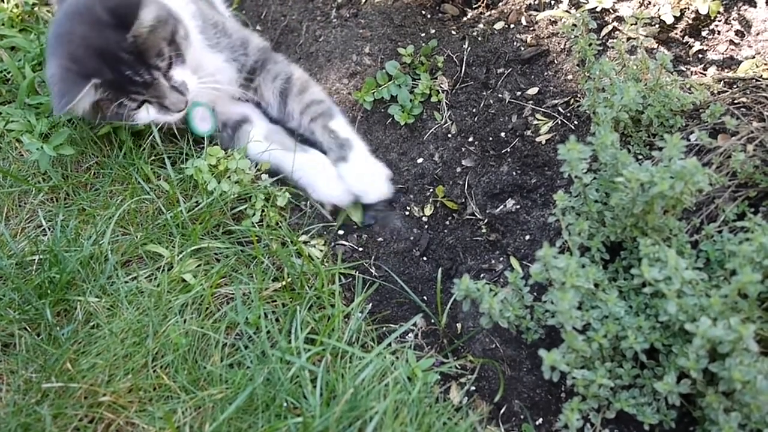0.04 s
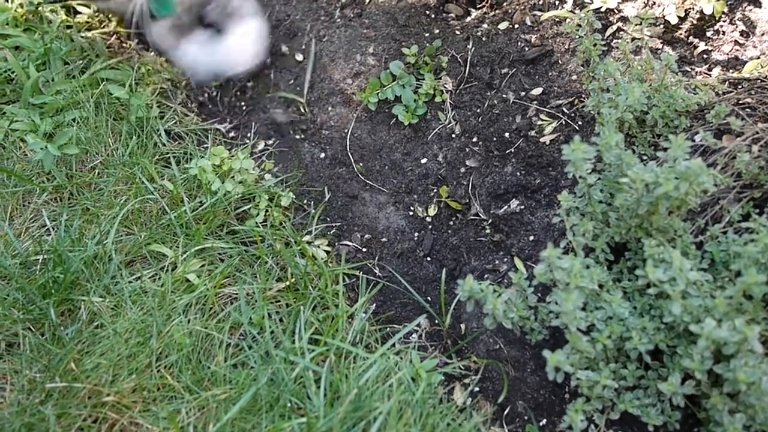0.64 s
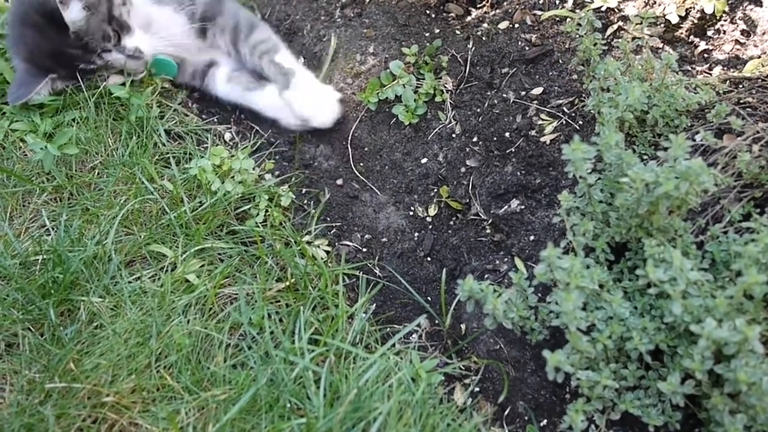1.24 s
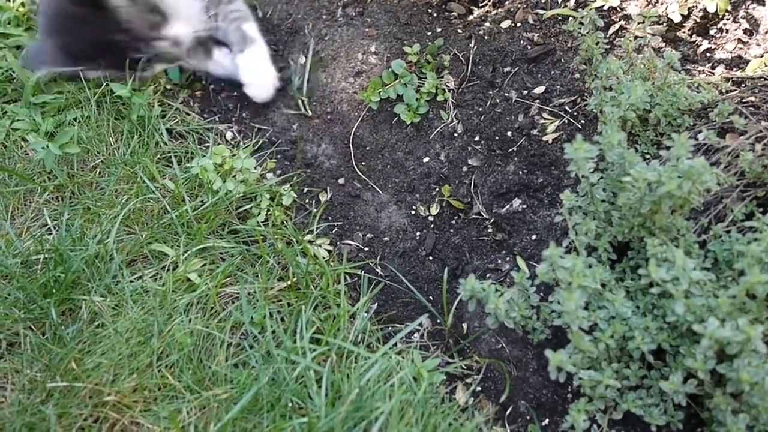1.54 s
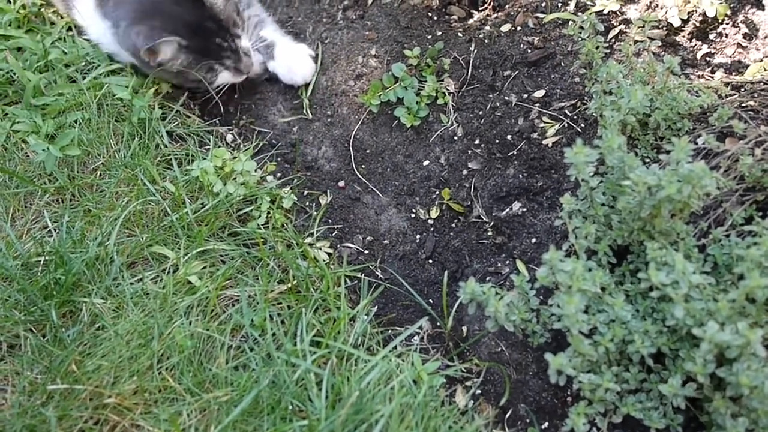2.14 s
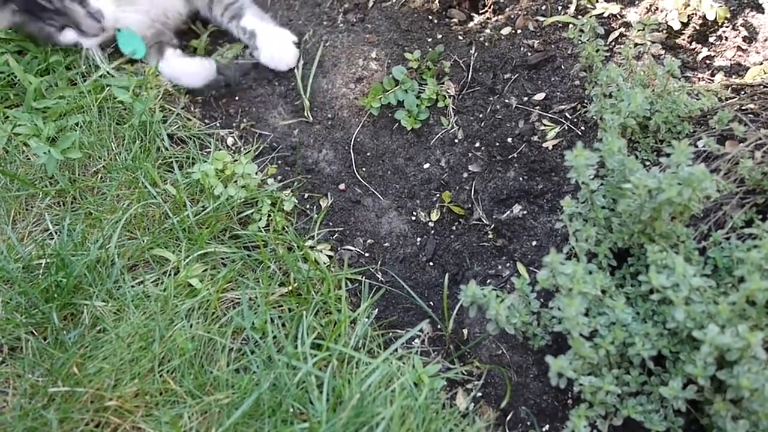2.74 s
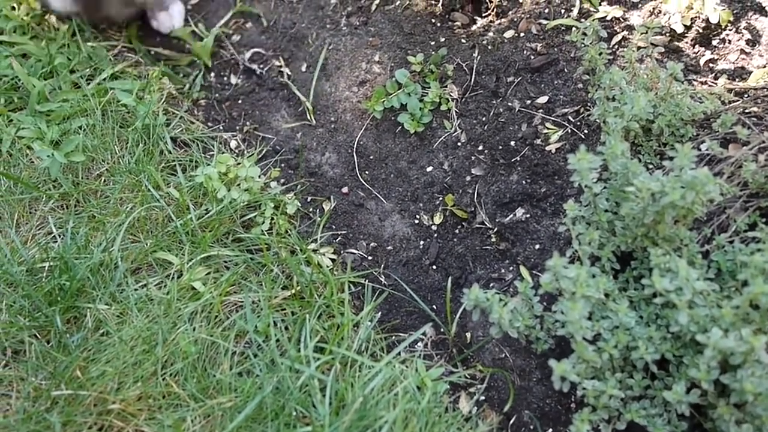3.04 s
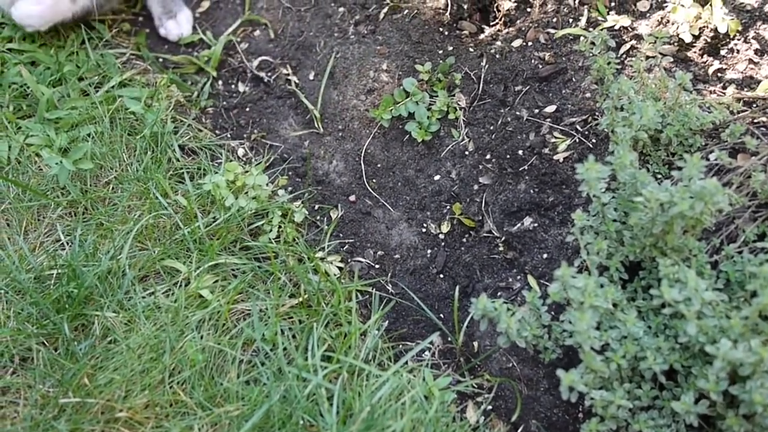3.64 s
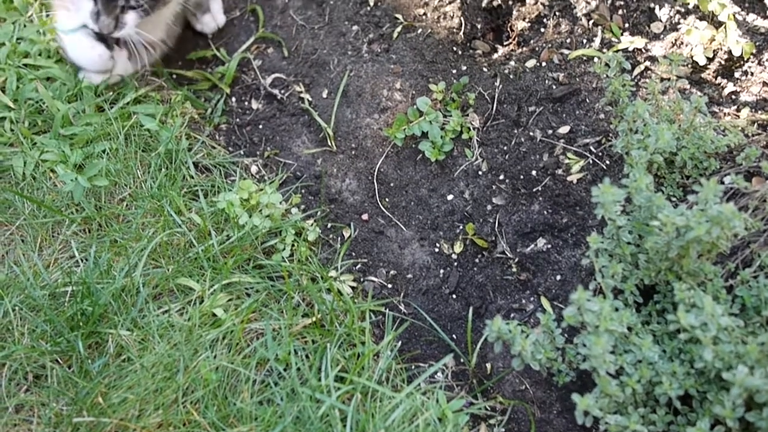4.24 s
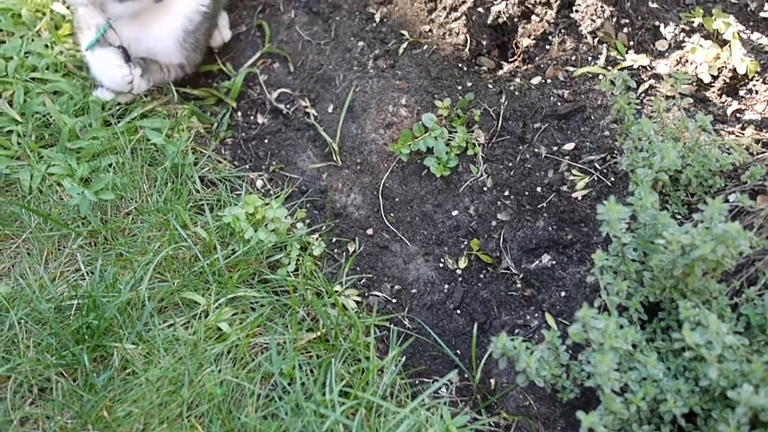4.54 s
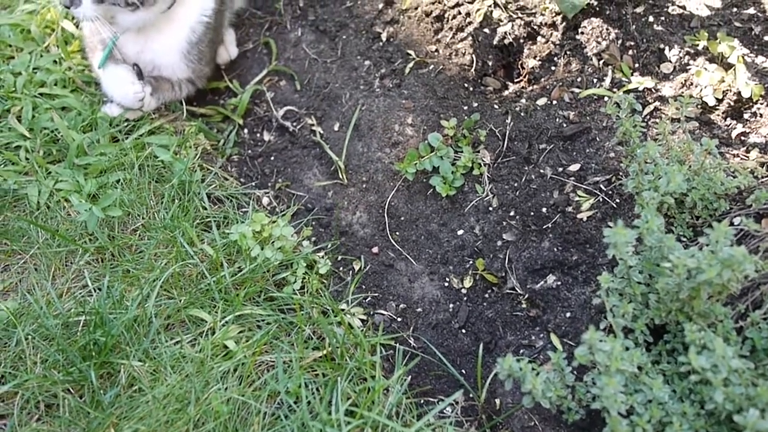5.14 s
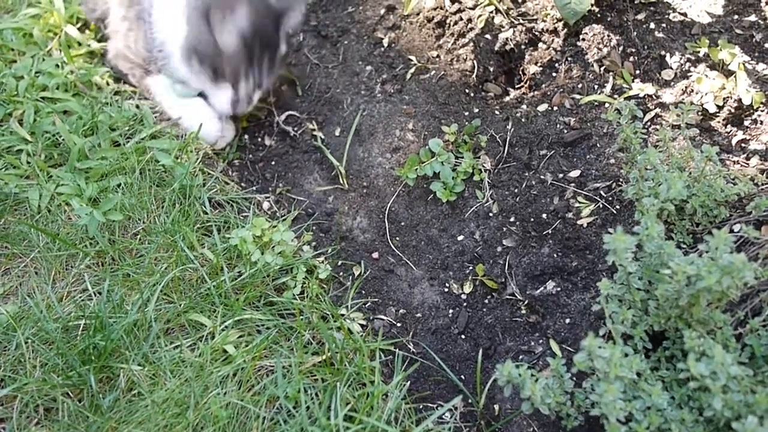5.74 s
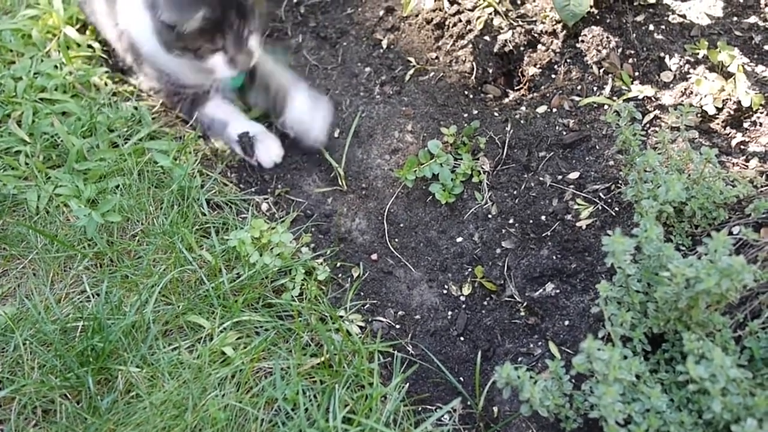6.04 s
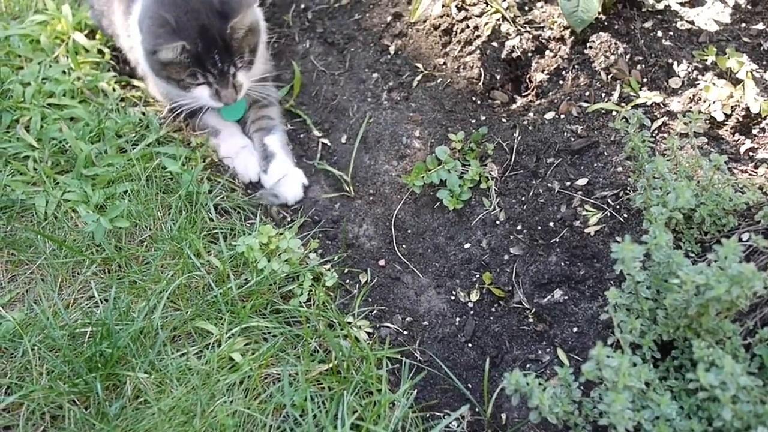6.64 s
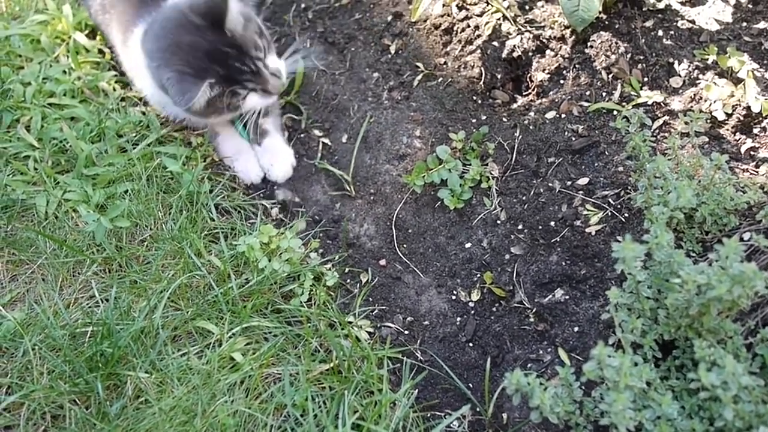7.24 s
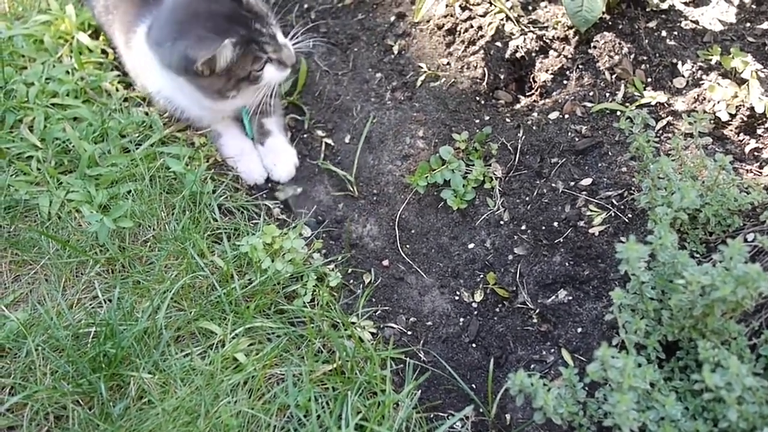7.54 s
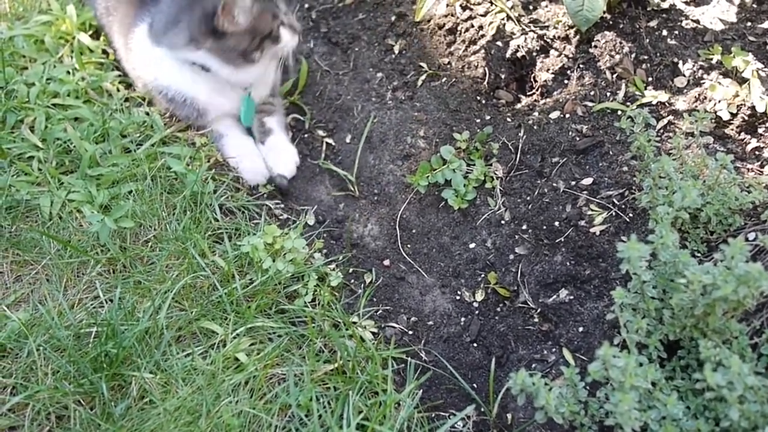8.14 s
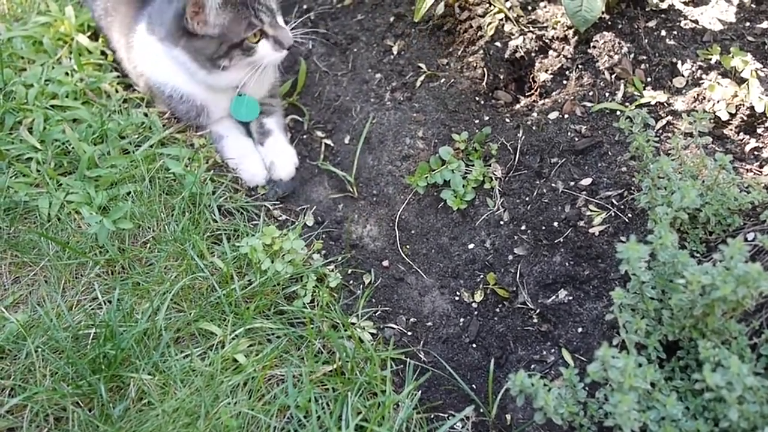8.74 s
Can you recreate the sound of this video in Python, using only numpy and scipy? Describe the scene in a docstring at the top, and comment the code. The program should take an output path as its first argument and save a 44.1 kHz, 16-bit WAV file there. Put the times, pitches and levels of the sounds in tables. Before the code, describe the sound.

A cat paws at a cicada in a garden, near the microphone. The insect starts with shrill, rattling bursts that thin out into scattered clicking twitches, mixed with rustling grass, gritty paw scuffs and snapping stalks. After one last short buzz and a sharp crack it falls silent. Small snaps continue over a light breeze, a faint far hum and a brief, low engine rumble in the distance.

```python
"""On a lawn, over soft air and a far machine's hum, a cat stirs the grass and paws at a cicada.
The insect protests at once in harsh buzzes: its tymbals, two ribbed drum skins, click as they buckle
in and again, higher, as they spring out. Paws scuff dry soil, stalks snap, and the buzzing breaks
into stutters and twitches. It flares again near 6 seconds and soon stops. The stalks go on
snapping while far leaves rustle and a distant engine swells and fades."""
import sys
import numpy as np
from scipy import signal
from scipy.fft import rfft, irfft, next_fast_len
from scipy.io import wavfile

SR = 44100
rng = np.random.default_rng(int(sys.argv[2]) if len(sys.argv) > 2 else 0)


def dump(signal):
    """Clip the signal to [-1, 1] and save it as 16-bit WAV at the path in sys.argv[1]."""
    limited = np.clip(np.atleast_2d(signal).T, -1, 1)
    pcm = np.round(limited * 32767).astype(np.int16)
    wavfile.write(sys.argv[1], SR, pcm)


N = 396018


def from_db(db):
    return 10 ** (np.asarray(db) / 20)


def unit_level(x):
    return x / np.sqrt(np.mean(x ** 2) + 1e-20)


def in_time(rows):
    """Join a table's points with straight lines: one curve for each column after the time."""
    times, *columns = np.transpose(rows)
    return [np.interp(np.arange(N) / SR, times, column) for column in columns]


def add(out, s, sound):
    """Lay a short sound into the track at s seconds."""
    start = int(round(s * SR))
    skip = max(0, -start)
    part = sound[skip:max(skip, N - start)]
    out[start + skip:start + skip + len(part)] += part


def drift(rate_hz):
    """A smooth random wobble, about 1 in size."""
    memory = np.exp(-80 * np.pi * rate_hz / SR)
    noise = rng.standard_normal(N // 40 + 2002)   # one value every 40 samples
    slow = signal.lfilter([1], [1, -2 * memory, memory * memory], noise)[2000:]
    return np.interp(np.arange(N) / 40, np.arange(len(slow)), unit_level(slow))


def clumps(rate_hz, depth_db):
    """A volume that swells and sinks at random, by at most depth_db."""
    return from_db(depth_db * np.tanh(drift(rate_hz)))


def coloured(x, spectrum):
    """Give a noise its balance of low and high pitches, at an average level of 1."""
    hz, level_db = np.transpose(spectrum)
    size = next_fast_len(N)
    bins = np.maximum(np.fft.rfftfreq(size, 1 / SR), 1)
    gain = from_db(np.interp(np.log(bins), np.log(hz), level_db))
    bass_cut = np.minimum(bins / hz[0], 1) ** 2
    return unit_level(irfft(rfft(x, size) * gain * bass_cut, size)[:N])


def band(x, low_hz, high_hz, order=2):
    """Keep the sound between two frequencies."""
    return signal.sosfilt(signal.butter(order, [low_hz, high_hz], "band", fs=SR, output="sos"), x + 1e-18)


def murmur(tones):
    """Noise ringing in narrow bands of pitch."""
    return sum(from_db(db) * unit_level(band(rng.standard_normal(N), hz - width / 2, hz + width / 2))
               for hz, width, db in tones)


# The tone of the air and of the leaves. Each row: frequency in Hz, relative level in dB.
AIR_COLOUR = [(25, -26.5), (50, -9), (80, -10), (206, -8), (290, -10), (516, -11), (734, -10.5),
              (1230, -15), (1600, -17.5), (3000, -23), (6000, -30), (11900, -37), (16000, -39)]
LEAF_COLOUR = [(1500, 2), (3500, -2), (8000, -2.5), (11000, -5.5), (16000, -16)]
# The breeze. Each row: time in seconds, level of the air in dB, level of the leaves in dB.
BREEZE = [(0, -51.5, -88), (1.9, -50, -75), (3, -49, -62.5), (5.3, -49, -68), (6.5, -49, -62),
          (7.5, -48.5, -58.5), (8.98, -49, -54)]

def breeze():
    """Open air rushes softly while far leaves slowly grow louder."""
    air_db, leaves_db = in_time(BREEZE)
    air = from_db(air_db) * coloured(rng.standard_normal(N), AIR_COLOUR)
    leaves = from_db(leaves_db) * coloured(rng.standard_normal(N), LEAF_COLOUR)
    return air + leaves


# The far machine's hum and its higher whine. Each row: time in seconds, relative level in dB.
HUM = [(0.0, -52.5), (3.15, -47.5), (3.35, -52), (3.8, -47), (4.2, -52.5), (4.83, -47.5), (5.05, -53),
       (5.43, -49.5), (6.35, -54), (6.55, -50), (8.98, -50)]
WHINE = [(0, -76), (.8, -76), (1.05, -66), (1.5, -80), (2, -70), (3.9, -76), (4.17, -62), (4.6, -78),
         (8.7, -71), (8.98, -64)]
# The neighbourhood's low drone. Each row: pitch in Hz, width in Hz, level in dB.
DRONE = [(120, 8.5, -63), (205.4, 18.2, -61.5)]

def machine(hum_hz=581.5, hum_db=-1.35, whine_hz=1209, whine_db=5.0, wander_hz=0.96):
    """Two slightly wavering tones fade in and out on the breeze, over a low drone."""
    def tone(hz, levels):
        phase = 2 * np.pi * np.cumsum(hz + wander_hz * drift(3.5)) / SR
        return np.sqrt(2) * from_db(in_time(levels)[0]) * np.sin(phase)
    return from_db(hum_db) * tone(hum_hz, HUM) + from_db(whine_db) * tone(whine_hz, WHINE) + murmur(DRONE)


# How hard the cat stirs the grass. Each row: time in seconds, relative level in dB.
STIR = [(0, -47.5), (.35, -51.5), (.75, -48), (1.62, -59.5), (1.75, -71), (2.2, -74), (2.5, -63.5),
        (2.72, -47.5), (3.7, -86), (3.95, -61.5), (4.2, -72.5), (5.1, -74), (5.68, -67.5), (5.82, -40.5),
        (5.96, -56), (6.45, -59.5), (6.85, -64.5), (8.05, -65), (8.13, -51), (8.2, -69), (8.98, -74)]
# The tone of the grass. Each row: frequency in Hz, relative level in dB.
GRASS_COLOUR = [(1500, -8), (3000, 2.5), (5000, -1), (8000, -1), (11000, 5.5), (14000, 2.5), (16000, -1.5)]

def grass(level_db=5.0, ticks_per_s=3000, tick_spread_db=3.0):
    """Blades slip past each other in clumps of tiny ticks."""
    stir_db, = in_time(STIR)
    sizes = from_db(tick_spread_db * np.minimum(rng.exponential(1, N), 4)) * rng.choice([-1, 1], N)
    ticks = sizes * (rng.random(N) < ticks_per_s / SR)
    return from_db(level_db + stir_db) * coloured(ticks * clumps(89, depth_db=13), GRASS_COLOUR)


# The tymbal's ring. Each row: multiple of the click's pitch, relative level in dB, cycles to its peak.
TYMBAL_RING = [(1.004, 1, 1.34), (1.031, -24, 5.4)]
# The belly's ring. Each row: pitch in Hz, relative level in dB, cycles to its peak.
BELLY_RING = [(4400, -22, 5.0), (6250, -21, 3.5)]
# The stiff ribs' crack. One row like the belly's, with its level for a click at USUAL_PITCH_HZ.
RIB_CRACK = (8900, -5, 1.38)
USUAL_PITCH_HZ = 5590

def tymbal_click(hz, rib_db_per_octave=19.0, pitch_spread=.015, spread_db=.5):
    """One snap of the ribbed skin: each ringing tone swells within a few cycles and dies away."""
    t = np.arange(SR // 100) / SR
    rib_hz, rib_db, rib_cycles = RIB_CRACK
    rib_db += rib_db_per_octave * np.log2(hz / USUAL_PITCH_HZ)   # a tighter skin cracks harder
    skin = [(ratio * hz, db, cycles) for ratio, db, cycles in TYMBAL_RING]
    tones = skin + BELLY_RING + [(rib_hz, rib_db, rib_cycles)]
    tone_hz, db, cycles = np.transpose(tones)[:, :, None]
    tone_hz = tone_hz * (1 + pitch_spread * rng.standard_normal(tone_hz.shape))
    strength = from_db(db + rng.normal(0, spread_db, db.shape))
    age = t * tone_hz / cycles   # 1 at the peak
    swell = (age * np.exp(1 - age)) ** 2
    return np.sum(strength * swell * np.sin(2 * np.pi * tone_hz * t), axis=0)


# Quick buzzes and slow stutters. Each row: start and end in seconds, strokes per second, relative level
# in dB, swell over the run in dB, pitch in Hz, dB of the in-click compared with the out-click.
RUNS = [(0.0068, 0.107, 111, -15.5, 0, 5700, -2.5), (0.115, 0.2397, 108, -16.5, 2.5, 5600, -1.5),
        (0.246, 0.4032, 94, -13.5, -0.5, 5580, -2), (0.426, 0.493, 108, -15, -1.5, 5600, -2.5),
        (0.5, 0.6233, 121, -19.5, 2, 5620, -1), (0.6302, 0.7045, 93, -19, -2, 5340, 0),
        (0.8188, 0.8953, 105, -14, -1.5, 5700, -1.5), (0.9065, 0.9385, 62, -16, -4, 5600, 1),
        (1.1188, 1.141, 88, -21, 2.5, 5300, 0), (1.174, 1.2106, 120, -18, 0.5, 5740, -1.5),
        (1.229, 1.2404, 85, -22.5, 5, 5950, 2), (1.246, 1.285, 98, -30, -6, 5300, -1.5),
        (1.298, 1.318, 53, -18.5, -2, 6250, -1), (1.3407, 1.427, 58, -18.5, 3, 6440, 0),
        (2.139, 2.184, 44, -18, -1, 5900, -1.5), (2.2045, 2.2512, 85, -16, 2, 5800, -3),
        (2.273, 2.2919, 87, -13.5, -1, 5870, -5.5), (2.613, 2.6342, 47, -20, 2.5, 5353, 3),
        (2.643, 2.7035, 85, -24.5, 3, 5400, 5.5), (2.721, 2.769, 108, -18.5, 2, 5930, -2.5),
        (2.7767, 2.817, 95, -19, -2, 7060, -5.5), (2.907, 2.9739, 45, -17.5, 0, 5505, -1),
        (2.9962, 3.0407, 45, -14, 5, 5830, -5), (3.3943, 3.534, 43, -26.5, -2, 5340, -1.5),
        (4.0674, 4.116, 41, -26, 1, 5110, 2.5), (4.3947, 4.4698, 40, -21.5, 1, 5320, -2.5),
        (4.568, 4.6234, 36, -20, 0.5, 5400, -5.5), (5.781, 5.8384, 110, -18.5, -2, 5620, -2),
        (5.849, 5.8774, 112, -17, 1, 5480, -1.5), (5.888, 5.93, 96, -17, 1.5, 5920, -1.5),
        (6.0153, 6.058, 45, -24, 0.5, 5036, 2)]
# Lone strokes. Each row: start in seconds, relative level in dB, pitch in Hz.
TWITCHES = [(0.727, -20.5, 4900), (1.0339, -14, 5710), (1.1573, -18.5, 5270), (2.3827, -13.5, 5660),
            (2.8418, -19.5, 5830), (4.6422, -21.5, 5240), (5.1154, -20.5, 5400), (5.6407, -25, 5390),
            (5.9427, -16, 5200), (6.4819, -22, 5140)]

def strokes(twitch_in_db=-4.5, buzz_above_per_s=90, octaves_per_db=0.068,
            lopsided_db=2.5, lopsided_octaves=0.041, limp_s=.0002,
            jitter_s=.00012, spread_db=.45, spread_octaves=.013, stutter_unevenness=3):
    """List every stroke. In a buzz the two unequal tymbals take turns (side +1, -1); else side is 0."""
    rows = [(s, db, hz, twitch_in_db, 0) for s, db, hz in TWITCHES]
    for first, last, rate, db, swell_db, hz, in_db in RUNS:
        buzzing = rate > buzz_above_per_s
        for k, along in enumerate(np.linspace(0, 1, round((last - first) * rate) + 1)):
            side = buzzing * (-1) ** k
            late, louder, higher = rng.standard_normal(3) * (1 if buzzing else stutter_unevenness)
            s = first + along * (last - first) + limp_s * side + jitter_s * late
            effort_db = swell_db * (along - .5) + spread_db * louder
            # a harder pull tightens the skin and raises its pitch
            octaves = octaves_per_db * effort_db + spread_octaves * higher - lopsided_octaves * side
            weaker_db = lopsided_db * side / 2
            rows.append((s, db + effort_db - weaker_db, hz * 2 ** octaves, in_db - weaker_db, side))
    return rows


# The main echo shifts as the insect is pushed about. Each row: time in seconds, delay in seconds.
ECHO_DELAY = [(0, .0018), (.56, 0.00134), (.72, .0013), (.82, 0.0019), (1.4, 0.0011), (2.2, 0.0014),
              (2.66, .0011), (2.8, .00135), (4.05, 0.001336), (4.4, .002), (5.2, 0.0016)]

def cicada(level_db=-1.5, rise_s=.00025, buzz_lead_s=.0058, lopsided_s=.0005, lone_lead_s=.0044,
           buzz_in_hz=4380, lone_in_hz=4560, echo_db=-9.0, soil_db=-18, soil_s=0.000447):
    """Each stroke clicks in, then out, with dull echoes from the cat and the soil."""
    clicks = np.zeros(N)
    for s, db, hz, in_db, side in strokes():
        lead_s = buzz_lead_s + lopsided_s * side if side else lone_lead_s
        follow = (hz / USUAL_PITCH_HZ) ** .7   # the in-click partly follows the out-click's pitch
        in_hz = (buzz_in_hz if side else lone_in_hz) * follow
        add(clicks, s - rise_s - lead_s, from_db(db + in_db) * tymbal_click(in_hz))
        add(clicks, s - rise_s, from_db(db) * tymbal_click(hz))
    samples = np.arange(N)
    dull = band(clicks, 3200, 7500)
    main_echo = np.interp(samples - SR * in_time(ECHO_DELAY)[0], samples, dull)
    soil_echo = np.interp(samples - SR * soil_s * (1 + 0.091 * drift(9)), samples, dull)
    sound = clicks + from_db(echo_db) * main_echo + from_db(soil_db) * soil_echo
    return from_db(level_db) * band(sound, 3200, 11800, order=4)   # so small a body gives off little bass


def crumbs(per_s=6, above_stir_db=28, max_db=-34, knock_db=-12.5):
    """List small random breaks for snaps() to play, louder when the grass is stirred harder."""
    times = rng.uniform(0, N / SR, round(per_s * N / SR))
    levels = np.minimum(np.interp(times, *np.transpose(STIR)) + above_stir_db, max_db)
    return [(s, db, db + knock_db) for s, db in zip(times, levels)]


# Paws on the soil. Each row: loudest moment in seconds, length in seconds, level in dB.
SCUFFS = [(0.745, 0.049, -40), (.79, 0.032, -51), (1.05, 0.018, -41), (1.3, 0.092, -41), (3.849, .03, -53),
          (5.73, 0.015, -40), (8.125, .04, -63)]
# The tone of the soil. Each row: frequency in Hz, relative level in dB.
SOIL_COLOUR = [(400, -31), (1200, -8), (2500, -1), (4000, -2.5), (8000, -5.5), (15000, -6)]

def scuffs():
    """A paw drags briefly through gritty soil."""
    t = np.arange(N) / SR
    push = sum(from_db(db) * np.exp(-np.minimum((2 * (t - s) / length) ** 2, 20))
               for s, length, db in SCUFFS)
    grit = rng.standard_normal(N) * clumps(210, depth_db=12)
    return push * coloured(grit, SOIL_COLOUR)


# The loudest stalks breaking. Each row: start in seconds, relative levels of crack and knock in dB.
SNAPS = [(0.994, -24, -50), (1.064, -25, -42), (1.517, -36, -53), (1.5815, -28.5, -46),
         (1.8552, -38.5, -54), (2.0612, -39, -47), (2.4346, -40, -52), (3.1048, -30, -51),
         (3.2176, -37, -52), (3.276, -32, -46), (3.8521, -36, -45.5), (4.371, -34, -50), (5.768, -24, -46),
         (5.8242, -14, -49), (5.9883, -36, -53), (6.2502, -28, -53), (6.3584, -32, -43),
         (6.8376, -31, -35.5), (6.9528, -32, -44.5), (6.9862, -32.5, -39), (7.041, -43, -39.5),
         (7.254, -32.5, -43.5), (7.425, -29, -40), (7.7248, -32, -40), (7.8526, -27.5, -39),
         (7.9753, -33, -44), (8.1317, -23.5, -39)]

def snaps(crack_db=-4.5, crack_s=.0015, wood_db=8.5, wood_s=0.0036, crumble_db=-2.5, crumble_s=0.0083):
    """A stalk breaks with a bright, splintering crack, a woody knock and a short crumbling after it."""
    cracks, knocks = np.zeros((2, N))
    t = np.arange(SR // 20) / SR
    for s, high_db, low_db in list(SNAPS) + crumbs():
        high, low = rng.standard_normal((2, len(t)))
        fibres = 2 * np.sign(high) * (np.abs(high) > 1.5)   # only the noise's peaks become ticks
        fade = np.exp(-t / crack_s) + from_db(crumble_db) * np.exp(-t / crumble_s)
        add(cracks, s, from_db(high_db + crack_db) * fibres * fade)
        add(knocks, s, from_db(low_db + wood_db) * low * np.exp(-t / wood_s))
    return band(cracks, 7500, 15180) + band(knocks, 1900, 4500)


# The far engine's loudness. Each row: time in seconds, level in dB.
ENGINE_LEVEL = [(0, -80), (6.9, -76), (7.4, -57), (7.75, -54.5), (8.1, -57.5), (8.6, -61), (8.98, -65)]
# Its deep tones. Each row: pitch in Hz, width in Hz, relative level in dB.
ENGINE_TONES = [(77, 4.7, 0), (140, 10, -6)]

def engine():
    """A distant engine's rumble swells and fades near the end."""
    return from_db(in_time(ENGINE_LEVEL)[0]) * murmur(ENGINE_TONES)


def garden(x, near_db=-18, near_s=0.0075, far_db=-22.0, far_s=0.032):
    """Add quick echoes from the plants close by and a faint tail from farther away."""
    t = np.arange(SR // 4) / SR
    echoes = np.zeros(len(t))
    for db, fade_s in (near_db, near_s), (far_db, far_s):
        tail = rng.standard_normal(len(t)) * np.exp(-t / fade_s) * (t > .001)
        echoes += from_db(db) * tail / np.linalg.norm(tail)
    return x + signal.fftconvolve(x, echoes)[:N]


def scene():
    """Close sounds with their echoes, over the far ones; the same in both ears."""
    mono = breeze() + machine() + garden(grass() + cicada() + scuffs() + snaps()) + engine()
    return np.array([mono, mono])


def record(dry, cutoff_hz=15800):
    """The highest treble is cut steeply."""
    return signal.sosfilt(signal.ellip(10, .1, 80, cutoff_hz, fs=SR, output="sos"), dry)


dry = scene()
out = record(dry)
dump(out)
```